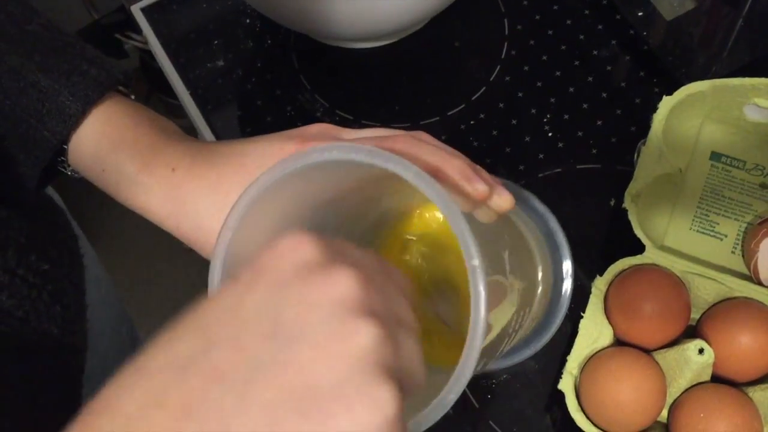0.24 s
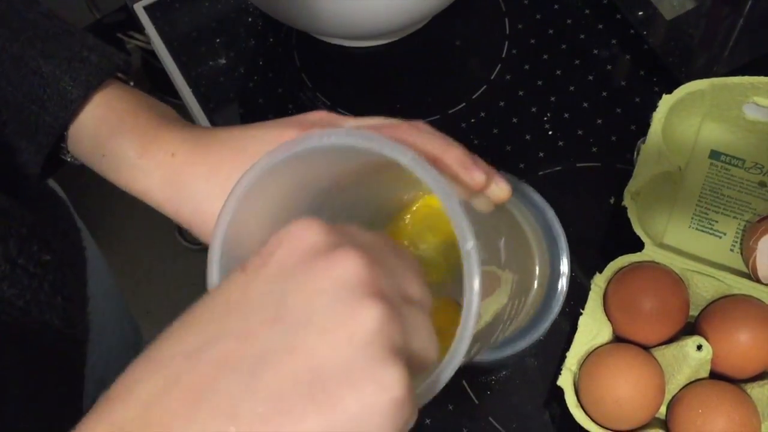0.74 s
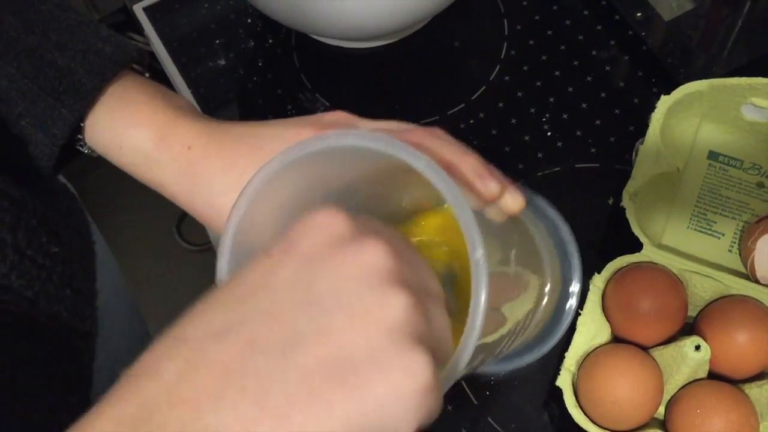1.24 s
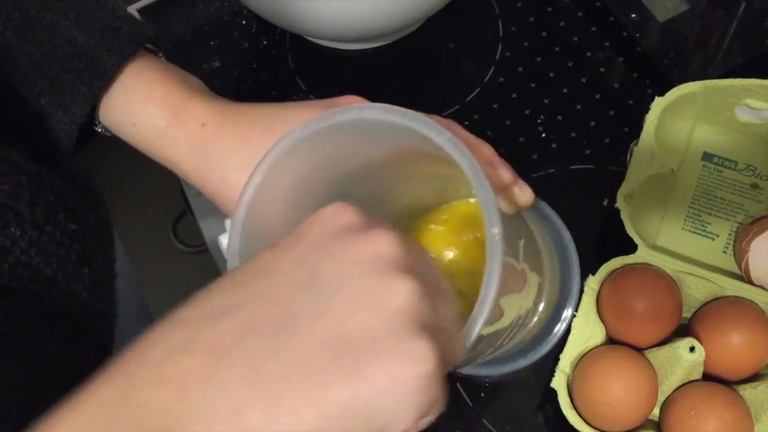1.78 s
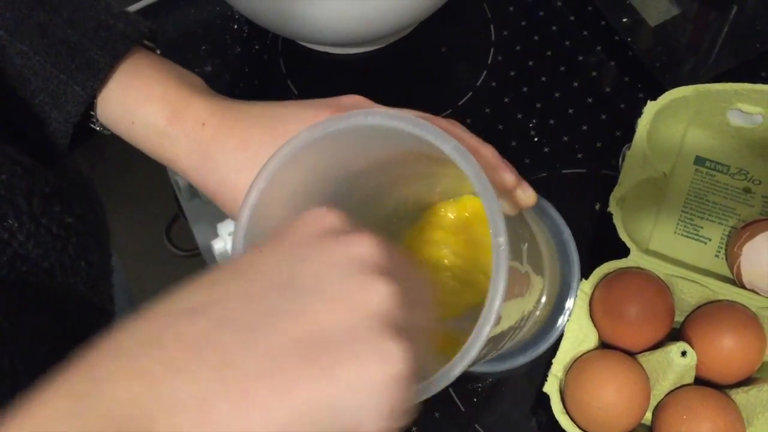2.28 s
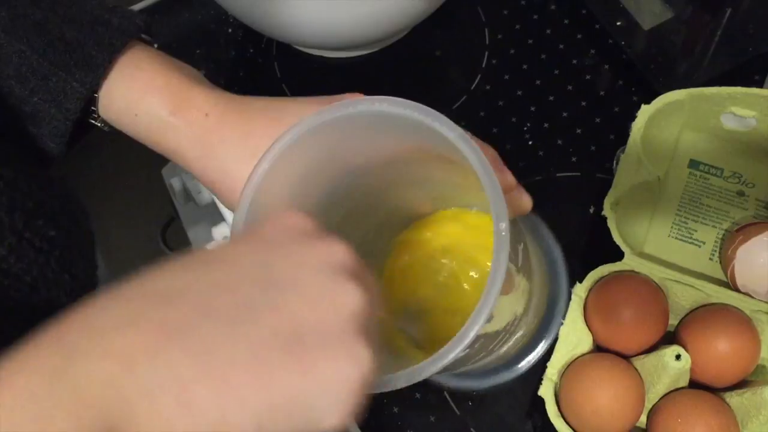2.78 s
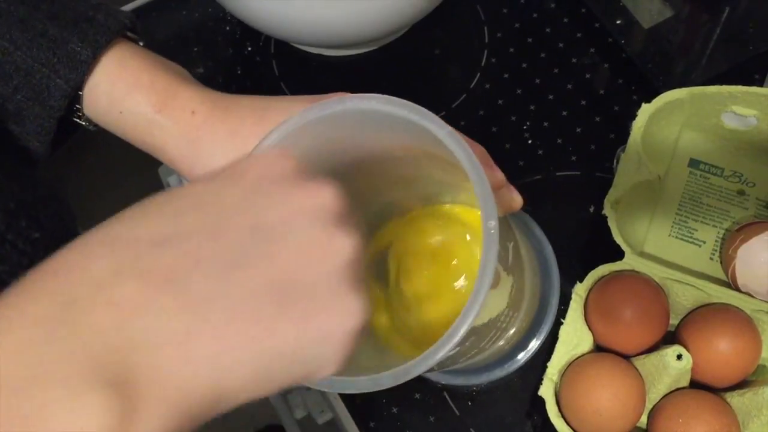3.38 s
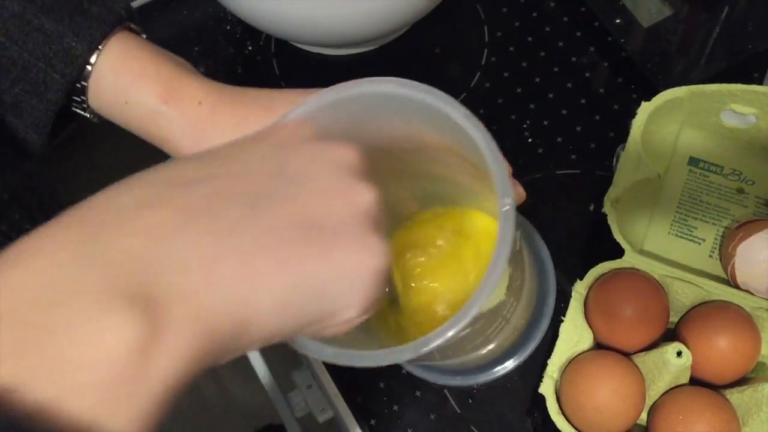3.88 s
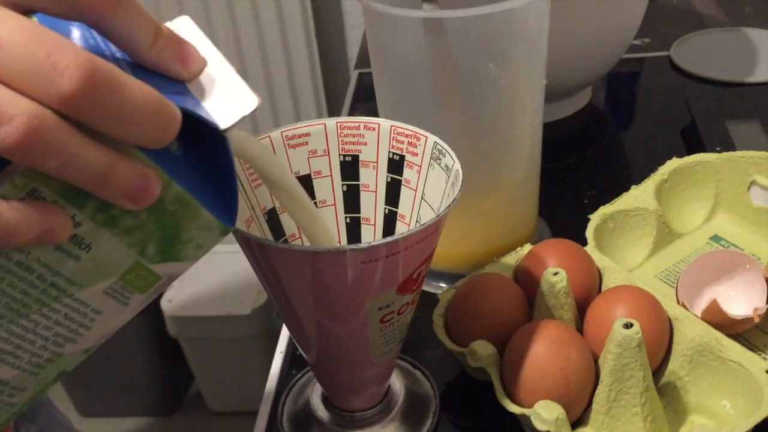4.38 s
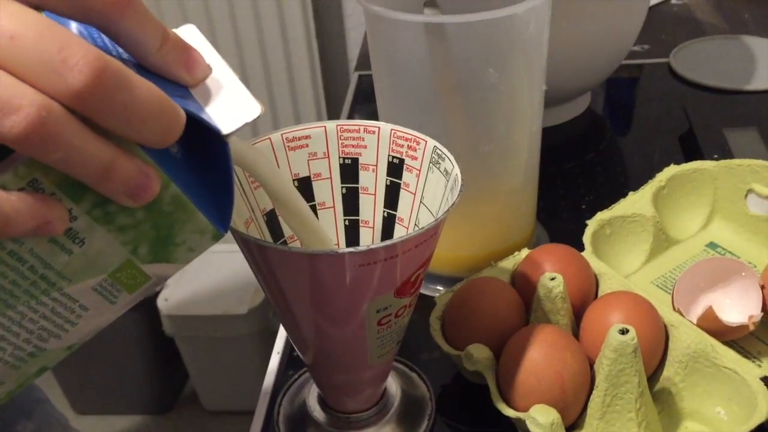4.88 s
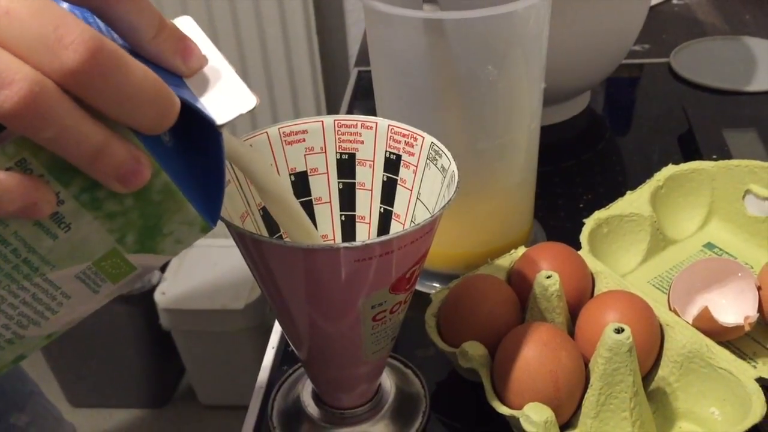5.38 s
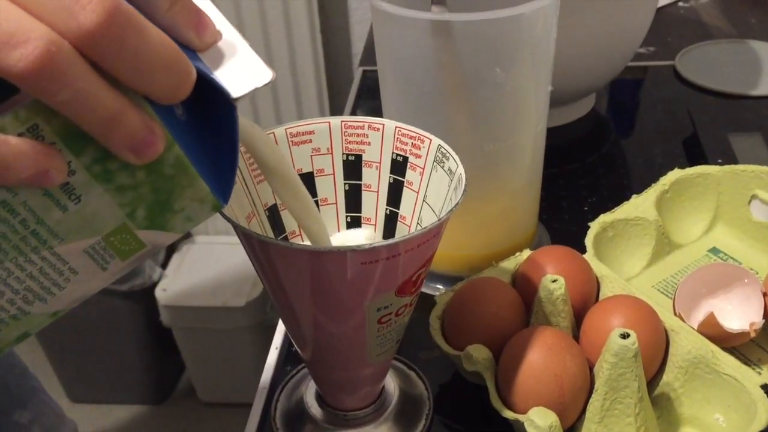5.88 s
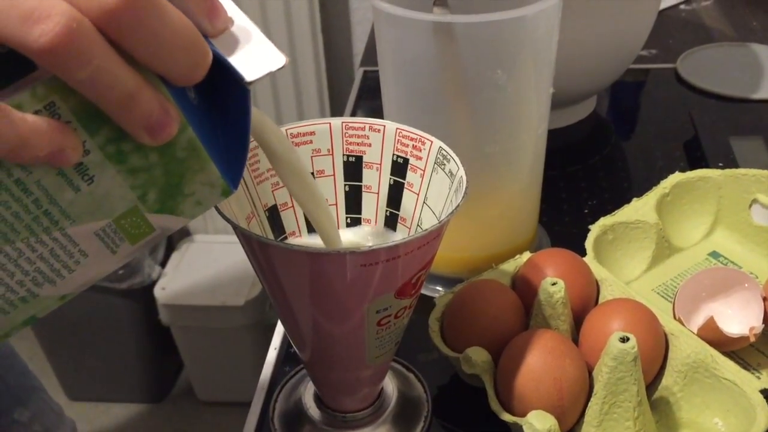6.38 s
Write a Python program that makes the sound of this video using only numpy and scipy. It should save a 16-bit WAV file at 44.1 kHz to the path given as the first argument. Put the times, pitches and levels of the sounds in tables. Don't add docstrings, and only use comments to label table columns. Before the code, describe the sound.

Brisk hollow plastic clicks and wet sloshing of eggs being whisked by fork, cutting to a soft, thin pour of milk over a fridge hum.

```python
import sys
import numpy as np
from scipy import signal
from scipy.fft import rfft, irfft
from scipy.io import wavfile
from scipy.ndimage import uniform_filter1d

SR = 44100
rng = np.random.default_rng(int(sys.argv[2]) if len(sys.argv) > 2 else 0)


def magnitude_from_level(level_db):
    exponent = np.asarray(level_db, float) / 20
    return 10 ** exponent


def materialize(psi):
    bounded = np.clip(np.atleast_2d(psi).T, -1, 1)
    quanta = np.round(bounded * 32767).astype(np.int16)
    wavfile.write(sys.argv[1], SR, quanta)


N = 292716

BREAK = [
    4.2115,
    4.258,
    4.272,
]
STOP_S, POUR_S, FULL_S = BREAK
# pitch_hz, level_db (per Hz)
TINES = [(4000, -11), (6300, -1), (7600, -9), (9400, -3), (10400, -16), (12000, -7), (12700, -14),
         (14500, -12.5), (15600, -14), (16500, -29)]
# pitch_hz, level_db, t60_s
STEEL = [(2300, 6.5, .04), (2600, 15.5, 0.02), (4450, 3, 0.033), (5900, -0.5, 0.025), (6960, -6.5, 0.015),
         (7800, -6.5, 0.044), (9350, 2.5, 0.03), (9970, -11, 0.016), (11100, -9.5, 0.034),
         (12300, -8, 0.03), (13210, -15.5, 0.053), (14300, -1, 0.034)]
# t60_s, level_db (under the blow)
ROOM = [
    (0.28, -24),
    (0.34, -12),
    (0.13, -26.5),
    (0.98, -26),
]


def level(x, db):
    return x * magnitude_from_level(db) / np.sqrt(np.mean(x ** 2))


def peak_one(x):
    return x / np.max(np.abs(x))


def decay(t, t60):
    return 1000. ** (-t / t60)


def onset(t, rise_s):
    return 1 - np.exp(-t / rise_s)


def sine(hz, t):
    return np.sin(2 * np.pi * hz * t)


def coloured(points, size):
    hz, db = np.transpose(points)
    f = np.fft.rfftfreq(size, 1 / SR) + 1
    gain = magnitude_from_level(np.interp(np.log(f), np.log(hz), db))
    return level(irfft(rfft(rng.standard_normal(size)) * gain, size), 0)


def narrow(hz, width):
    skirt = [(hz - 3 * width, -110), (hz - width / 2, 0), (hz + width / 2, 0), (hz + 3 * width, -110)]
    return coloured(skirt, size=N)


def walk(rate):
    k = int(SR / rate)
    steps = np.repeat(rng.standard_normal(N // k + 1), k)
    smooth = uniform_filter1d(uniform_filter1d(steps, k), k)
    return level(smooth[:N], 0)


def ring(modes, t, scatter_db, detune):
    hz, db, t60 = np.transpose(modes)[:, :, None]
    chance = rng.standard_normal((3, len(modes), 1))
    gain = np.sign(chance[2]) * magnitude_from_level(db + scatter_db * chance[0])
    tones = gain * sine(hz * (1 + detune * chance[1]), t) * decay(t, t60)
    return peak_one(np.sum(tones, axis=0))


def add(out, s, x):
    i = int(s * SR)
    out[i:i + len(x)] += x[:N - i]


def kitchen():
    # pitch_hz, level_db (per Hz)
    air_colour = [(25, -48), (58, -21.5), (86, -1), (194, -9.5), (259, -4.5), (461, -19.5), (740, -19),
                  (800, -33), (1100, -32.5), (1500, -28.5), (4600, -38), (8000, -49.5), (14300, -55),
                  (15200, -81.5)]
    # pitch_hz, level_db (rms), wander_width_hz
    fridge = [(43.3, -75.5, 1.8), (86.2, -77, 3.3), (100.2, -60, 6.5), (136.4, -67, 5.6),
              (146.5, -65.5, 4.4), (183.7, -70, 2.5), (209.5, -68, 0.72), (256.2, -64, 9),
              (301.8, -65, 4.4), (333.7, -67, 8), (416, -70, 1.7)]
    air = magnitude_from_level(-55.5 + 0.4 * walk(7)) * coloured(air_colour, size=N)
    return air + sum(magnitude_from_level(db) * narrow(hz, width) for hz, db, width in fridge)


def slosh(stir_db=-55.5, rise_db_s=136.5, fall_db_s=134.5, grain_db=4.0):
    # time_s, level_db
    surges = [(0.0, -53), (0.72, -61), (1.16, -47), (1.73, -59), (2.36, -47.5), (2.89, -64.5), (3.09, -54),
              (3.57, -41), (3.72, -52), (3.97, -56.5), (4.15, -51.5)]
    # pitch_hz, level_db (per Hz)
    colour = [(300, 11.5), (900, 6), (1600, 6.5), (2300, 12), (3200, 4.5), (4600, -7), (7000, -14),
              (11000, -31.5), (16000, -41.5)]
    t, flow = np.arange(N) / SR, magnitude_from_level(stir_db)
    for s, db in surges:
        flow = flow + magnitude_from_level(db + np.minimum(rise_db_s * (t - s), -fall_db_s * (t - s)))
    grain = magnitude_from_level(-9.5 + grain_db * walk(110) + 2.2 * walk(30))
    return flow * grain * coloured(colour, size=N)


def ticks(rate=70, tick_db=-62, spread_db=3, most_db=8, t60=.016):
    out, t = np.zeros(N), np.arange(1024) / SR
    for k, (a, b, c) in enumerate(rng.random((400, 3))):
        peak_db = tick_db + min(-spread_db * np.log(1 - b), most_db)
        rising = sine(1500 * 3.3 ** c * (1 + 3.0 * t), t)
        add(out, min((k + a) / rate, STOP_S), magnitude_from_level(peak_db) * rising * decay(t, t60))
    return out


def grazes(grip_t60_s=.018):
    # start_s, peak_db, length_s
    brushes = [(.004, -43, 0.015), (0.132, -31.5, 0.0076), (0.219, -44, 0.0033), (0.23, -40, 0.0034),
               (0.378, -37, 0.0033), (0.458, -56, .02), (0.718, -55, 0.022), (0.877, -43, 0.0031),
               (0.969, -45, 0.013), (1.096, -46, .008), (1.192, -70, .025), (1.34, -41, 0.0025),
               (1.434, -47, 0.014), (1.67, -45.5, 0.019), (2.046, -40, 0.013), (2.308, -34, 0.0058),
               (2.422, -55, .012), (2.571, -28.5, 0.002), (2.758, -54, 0.0036), (2.983, -50, 0.0027),
               (3.013, -45.5, 0.0082), (3.147, -46, 0.011), (3.267, -52.5, 0.011), (3.481, -45.5, 0.0072),
               (3.758, -35.5, 0.013), (3.803, -38.5, 0.0096), (3.952, -49, 0.0094), (4.053, -41, 0.012),
               (4.091, -54, .003), (2.536, -27, 0.0054), (3.548, -29, 0.012)]
    out, t = np.zeros(N), np.arange(4096) / SR
    for s, peak_db, length in brushes:
        slide = np.exp(-t / length)
        gripped = ring(STEEL, t, scatter_db=3.5, detune=0.013) * decay(t, grip_t60_s)
        rough = rng.standard_normal(len(t)) ** 3 * slide
        y = signal.fftconvolve(gripped, rough)[:len(t)]
        hiss = magnitude_from_level(-18.0) * slide * coloured(TINES, size=len(t))
        add(out, s, magnitude_from_level(peak_db) * (peak_one(y) + hiss))
    return out


def blows():
    # start_s, peak_db, ring_hz, second_ring_hz
    touches = [(0.039, -39.5, 2380, 2900), (0.249, -34, 2700, 3060), (0.2625, -22.5, 2490, 2970),
               (0.513, -27, 2620, 2170), (0.7455, -26.5, 2680, 3200), (0.9926, -27, 3110, 2680),
               (1.246, -30.5, 2560, 3160), (1.465, -20.5, 2924, 2470), (1.722, -34, 2720, 3080),
               (1.977, -35, 2650, 3070), (2.215, -40.5, 3170, 2600), (2.4621, -35.5, 2600, 2980),
               (3.1796, -28.5, 2900, 2300), (3.4372, -41, 2170, 2600), (3.462, -23, 2200, 2590),
               (3.704, -38, 2600, 2970), (3.719, -25, 2300, 2100), (3.9747, -24, 2970, 2250)]
    # start_s, peak_db, ring_hz, second_ring_hz, air_db (against the click)
    flats = [(0.1199, -22, 2970, 2110, -2), (0.3568, -18.5, 3080, 2020, -3.5),
             (0.586, -17.5, 3110, 3570, -2), (0.836, -18.5, 3060, 2010, -3.5),
             (1.0815, -18, 3090, 1990, -8.5), (1.313, -20.5, 3120, 2190, -4.5),
             (1.5422, -18.5, 3180, 2480, -4.5), (1.5828, -19.5, 2640, 3320, -0.5),
             (1.5899, -21, 3170, 3550, -4.5), (1.7901, -19.5, 3070, 2040, -2.5),
             (1.8161, -20, 3350, 2820, -1), (1.8828, -32.5, 2600, 3150, -6), (1.938, -47, 2120, 2600, -14),
             (2.0369, -18.5, 3220, 2650, -9), (2.1302, -34.5, 2720, 2200, -11),
             (2.1843, -40, 2120, 2600, -11), (2.2815, -19.5, 3210, 2170, -6.5),
             (2.3002, -18, 3640, 5240, -1), (2.316, -25.5, 2200, 2980, -5.5), (2.5335, -18, 4550, 4250, 2),
             (2.986, -21.5, 2495, 4600, 1.5), (3.251, -20.5, 3230, 2560, -4), (3.541, -17, 2350, 3090, -10),
             (3.755, -27.5, 3110, 2500, -5), (4.0479, -32, 2270, 2350, -3.5)]
    # start_s, peak_db, ring_hz, air_db, treble_db (last two against the click)
    edges = [(0.1454, -15, 2500, -14, -15), (0.393, -21, 2700, -21, -19), (0.6411, -32, 4250, -6.5, -14.5),
             (0.89, -14.5, 2600, -13, -15.5), (1.1227, -20, 2550, -12, -17),
             (1.3601, -25.5, 2620, -14.5, -18), (1.439, -58, 2120, -1, -8),
             (1.6287, -17.5, 2450, -7.5, -12), (1.851, -22.5, 2500, -10.5, -12),
             (2.0825, -13.5, 2610, -19, -12), (2.3426, -14, 2687, -15, -12.5),
             (2.5817, -13.5, 2570, -12, -11), (2.7788, -8, 1486, -18, -11.5),
             (3.049, -12, 2590, -12.5, -13.5), (3.091, -35, 2570, -4.5, -16),
             (3.302, -12.5, 2800, -24.5, -13), (3.373, -27, 2600, -34, -22),
             (3.5821, -15, 3960, -17.5, -13.5), (3.6403, -28.5, 2590, -15.5, -18),
             (3.8372, -8.5, 5210, -28.5, -9.5), (3.8884, -31, 4400, -11, -16),
             (4.1063, -15, 1606, -34, -10.5)]
    found = []
    for s, db, hz, hz2, air_db in flats:
        treble_db = -20 + 8 * np.log2(hz / 3013)
        found.append((s, db, hz, hz2, air_db, -23.5, treble_db))
    for s, db, hz, air_db, treble_db in edges:
        found.append((s, db, hz, 1.08 * hz, air_db, -16, treble_db))
    for s, db, hz, hz2 in touches:
        treble_db = -28 + 0.85 * (db + 30.5)
        found.append((s, db, hz, hz2, -19, -45.5, treble_db))
    return sorted(found)


def causal(cepstrum):
    half = len(cepstrum) // 2
    return cepstrum * np.concatenate([[1], 2 * np.ones(half - 1), [1], np.zeros(half - 1)])


def crack(colour, t, t60, rise_s, patchy_db=4.5, patch_hz=260, tick_db=2.0, tick_s=0.00066):
    # delay_s, level_db
    echoes = [
        (.0045, -14.5),
        (.009, -15),
        (0.015, -27.5),
    ]
    fall = onset(t, rise_s) * (decay(t, t60) + magnitude_from_level(tick_db) * np.exp(-t / tick_s))
    shape = fall + sum(magnitude_from_level(db) * np.interp(t - s, t, fall, left=0) for s, db in echoes)
    f = np.fft.rfftfreq(len(t), 1 / SR)
    spots = np.tanh(rng.standard_normal(256))
    patches = magnitude_from_level(patchy_db * np.interp(f / patch_hz, np.arange(256), spots))
    response = np.exp(rfft(causal(irfft(np.log(patches)))))
    burst = coloured(colour, size=len(t)) * shape
    return peak_one(irfft(rfft(burst) * response, len(t)))


def room(energy, colours, build_s=0.002, grain_db=2.8):
    # pitch_hz, level_db (against the tail), width_hz
    tail_rings = [(962, -14.5, 71), (1210, -16.5, 100), (1550, -19, 70), (2170, -11.5, 60),
                  (2555, -10, 100), (3110, -17, 60), (3520, -14, 70), (4250, -20, 89), (4600, -18.5, 70),
                  (5240, -19.5, 50), (5710, -18.5, 40), (6315, -18.5, 44)]
    out, build = 0, np.exp(-1 / (build_s * SR))
    tones = [coloured(colour, size=N) for colour in colours]
    rings = sum(magnitude_from_level(db + 1.5 + 2.3 * walk(25)) * narrow(hz, width) for hz, db, width in tail_rings)
    tones[0] = tones[0] + rings
    for part, tone, (t60, db) in zip(energy, tones, ROOM):
        power = signal.lfilter([1], [1, -np.exp(-2 * np.log(1000) / (t60 * SR))], part)
        power = signal.lfilter([1 - build], [1, -build], power)
        out = out + magnitude_from_level(db + grain_db * walk(90)) * np.sqrt(np.abs(power)) * tone
    return out


def fork(beat_hz=40, beat=0.74, base_rise_s=0.012, rise_s=0.00057, flat_from_db=-17, flat_span_db=9):
    # pitch_hz, level_db (per Hz)
    upper_colour = [(900, -31), (1750, -14), (2150, 2), (2380, 0), (2620, -1.5), (2900, -1.5), (3200, -0.5),
                    (3700, -4), (4550, -3), (4900, -5.5), (5300, -8), (6500, -12.5), (7200, -13),
                    (9000, -35)]
    # pitch_hz, level_db (per Hz)
    lower_colour = [(150, -26.5), (260, 4.5), (600, 0.5), (760, -3.5), (950, -4), (1100, -2), (1300, 0.5),
                    (1550, -6), (1750, -9.5), (2300, -29.5)]
    # pitch_hz, level_db, t60_s
    soft_modes = [(2076, -6, 0.082), (2270, -4, 0.02), (2570, -4, 0.055), (3170, 1, 0.03),
                  (3560, -5.5, 0.047), (4380, 0, 0.031), (5250, -2, 0.0044)]
    # pitch_hz, level_db, t60_s
    hard_modes = [(2200, -5.5, 0.038), (2500, 3, 0.037), (2640, 2.5, 0.028), (2830, -1, .03),
                  (2980, -1.5, .03), (3490, -4, .03), (4013, -4.5, 0.018), (4600, 1, 0.054),
                  (5230, -5.5, 0.042), (6070, -4, 0.017)]
    # pitch_hz, level_db, t60_s
    air_modes = [(481.6, 4, 0.15), (347, -18.5, 0.059), (583, -20.5, 0.13), (500, -17.5, 0.068),
                 (446, -10.5, 0.11)]
    # pitch_hz, level_db, t60_s
    base_modes = [(166, -1, 0.1614), (124.4, -11, 0.26), (222, -5, 0.065)]
    # pitch_hz, level_db (per Hz)
    low_room = [(90, -22), (150, -6.5), (300, -4.5), (420, -0.5), (485, 7), (560, -1.5), (750, -40)]
    out, t = np.zeros(N), np.arange(8192) / SR
    energy = np.zeros((len(ROOM), N))
    for s, peak_db, hz, hz2, air_db, lower_db, treble_db in blows():
        flat = np.clip((air_db - flat_from_db) / flat_span_db, 0, 1)
        focused = [(f, db - 5.5 * abs(np.log2(f / hz))) for f, db in upper_colour]
        wall = magnitude_from_level(-2.5 - 8 * flat) * crack(focused, t, 0.023, rise_s)
        wall += flat * magnitude_from_level(-4.0) * ring(soft_modes, t, scatter_db=3.0, detune=0.017)
        hard_gain = (1 - flat) * magnitude_from_level(-6.0 + 0.43 * (lower_db + 14.5))
        wall += hard_gain * ring(hard_modes, t, scatter_db=6.0, detune=0.021)
        pair = sine(hz, t) - magnitude_from_level(-3.0) * sine(hz2, t)
        wall += magnitude_from_level(-8.0 + 4.3 * flat) * pair * decay(t, 0.028)
        linger = [(hz - 400, -30), (hz - 110, 0), (hz + 110, 0), (hz + 400, -30)]
        wall += magnitude_from_level(-29) * coloured(linger, size=len(t)) * decay(t, .16)

        tines = crack(TINES, t, 0.0072, rise_s, patchy_db=3.5)
        tines += magnitude_from_level(-17.0 + 3.6 * flat) * ring(STEEL, t, scatter_db=4.5, detune=0.023)
        lower = crack(lower_colour, t, 0.031, 3 * rise_s)

        swell_hz = beat_hz * magnitude_from_level(-0.35 * np.clip(peak_db + air_db + 22, -4, 12))
        swell = 1 - beat * np.cos(2 * np.pi * swell_hz * t) * np.exp(-t / 0.043)
        air = ring(air_modes, t, scatter_db=2.5, detune=0.0086) * swell
        base = ring(base_modes, t, scatter_db=-4.0, detune=0.022) * onset(t, base_rise_s)
        base_gain = magnitude_from_level(air_db - 9.0) + magnitude_from_level(lower_db - 7.5)

        parts_db = np.array([-3, lower_db + 1.5, treble_db + 10.0, air_db - 0.5])
        blow = magnitude_from_level(parts_db) @ np.array([peak_one(wall), lower, tines, air]) + base_gain * base
        add(out, s, magnitude_from_level(peak_db) * blow)
        send_db = peak_db + parts_db - 2.8 * flat + 0.3 * (lower_db + 18)
        energy[:, int(s * SR)] = magnitude_from_level(send_db) ** 2
    out = signal.sosfilt(signal.butter(2, 90, "high", fs=SR, output="sos"), out)
    return out + room(energy, [upper_colour, lower_colour, TINES, low_room])


def belly(t60=0.034, bright_t60=.03, rise_s=.0008):
    # start_s, peak_db,
    # pitch_hz
    belly_notes = [(.1199, -38, 987), (0.145, -26.5, 1260), (.1454, -27, 1470), (0.3567, -39, 960),
                   (0.392, -29, 1320), (.5866, -39, 885), (.6419, -43.5, 1190), (0.837, -36, 1020),
                   (.89, -32, 1320), (.89, -33, 1010), (1.081, -33.5, 1020), (1.123, -30.5, 1320),
                   (1.3144, -39.5, 995), (1.3603, -47, 1168), (1.5414, -37, 1350), (1.6298, -32.5, 1380),
                   (1.7904, -43, 870), (1.851, -33, 1084), (2.0369, -43, 940), (2.0827, -25.5, 1320),
                   (2.2824, -42, 960), (2.3434, -23.5, 1350), (2.5819, -26, 1237), (2.7787, -35.5, 940),
                   (2.9848, -48, 940), (3.048, -24, 1366), (3.251, -42, 940), (3.302, -26.5, 967),
                   (3.302, -30, 1620), (3.5415, -44, 904.7), (3.5823, -34, 820), (3.8368, -24, 1454),
                   (3.8376, -30, 1025), (.997, -43, 466), (1.148, -38, 474), (1.252, -44, 475),
                   (2.5441, -26.5, 470)]
    # start_s, peak_db, pitch_hz
    bright_notes = [(.1454, -29, 3948), (.1454, -22, 5910), (.393, -30, 2040), (.393, -40, 3220),
                    (.5866, -37, 4390), (.6419, -40, 2730), (.836, -25, 2266), (.89, -28, 4010),
                    (.89, -28, 4380), (1.0814, -32, 2520), (1.1227, -26.5, 3900), (1.3138, -32, 4360),
                    (1.3601, -34, 4250), (1.6284, -32, 3250), (1.6284, -30.5, 4600), (1.851, -39, 2120),
                    (2.0827, -29, 2190), (2.0827, -32, 3500), (2.0827, -20.5, 6217), (2.3422, -21, 6080),
                    (2.3422, -32, 2217), (2.5326, -24.5, 3210), (2.5817, -28, 3456), (2.5817, -29, 5900),
                    (2.7786, -17, 2900), (2.7786, -23, 4600), (2.9858, -31, 4340), (3.048, -27, 3310),
                    (3.048, -26, 4600), (3.302, -19, 4570), (3.302, -24, 4920), (3.5823, -23, 4100),
                    (3.8373, -19, 3780), (3.8373, -30, 2500), (4.1064, -31, 2430), (.133, -24, 2080),
                    (1.3601, -32, 6750), (1.3601, -42, 14600), (2.5711, -21, 9000), (2.5711, -21, 12400),
                    (2.7786, -32, 5500), (2.7786, -33, 6540), (3.302, -27, 6720), (3.462, -34, 3600),
                    (3.462, -36, 7950), (3.7186, -31, 2300), (1.5901, -29, 8850), (3.757, -44, 14200),
                    (3.757, -40, 4460), (1.465, -34, 2170), (1.5827, -35, 5250)]
    out, t = np.zeros(N), np.arange(4096) / SR
    for notes, fade in ((belly_notes, t60), (bright_notes, bright_t60)):
        for s, peak_db, hz in notes:
            damping = max(1, hz / 4500) * min(1, hz / 1100)
            add(out, s, magnitude_from_level(peak_db) * sine(hz, t) * onset(t, rise_s) * decay(t, fade / damping))
    return out


def stream(rate=45, patter_db=-66, spread_db=2.0, drop_t60=.025, rise_s=0.0011):
    drops = list([(4.717, -57, 1580), (4.804, -52, 1200), (5.058, -60.5, 3820), (5.135, -57, 2950),
                  (5.57, -55, 1540), (5.695, -54, 1710), (5.737, -54, 2250), (5.838, -54, 1500),
                  (5.965, -54, 1480), (6.02, -58, 2950), (6.025, -52, 1600), (6.053, -55, 1440),
                  (6.214, -53, 1680), (6.329, -52, 1470), (6.45, -54, 1550)])
    # start_s, length_s, pitch_hz, level_db (rms)
    singing = [(5.9, .13, 2020, -69), (6.09, .06, 2020, -71), (6.34, .14, 2010, -73),
               (5.76, .08, 1190, -73), (6.1, .08, 1190, -73), (6.2, .16, 1200, -69), (5.55, .06, 870, -73)]
    # start_s, level_db, t60_s
    spray = [
        (5.065, -62, 0.14),
        (5.178, -57, 0.29),
        (5.228, -59.5, 0.38),
        (5.398, -63, 0.24),
    ]
    # pitch_hz, level_db (per Hz)
    spray_colour = [(600, -20), (900, 1), (2200, 5), (3800, -20), (6000, -17), (12000, -35)]
    out, t = np.zeros(N), np.arange(8192) / SR
    for k, (a, b, c) in enumerate(rng.random((400, 3))):
        s = POUR_S + (k + a) / rate
        if s < N / SR:
            drops.append((s, patter_db - spread_db * np.log(1 - b), 1350 * 1.8 ** (c * c)))
    u = t[:2048]
    for s, peak_db, hz in drops:
        rising = sine(hz * (1 + 0.52 * u), u)
        add(out, s, magnitude_from_level(peak_db) * rising * onset(u, rise_s) * decay(u, drop_t60))
    for s, length, hz, db in singing:
        swell = np.sqrt(np.sin(np.pi * np.clip(t / length, 0, 1)) ** 2)
        add(out, s, magnitude_from_level(db + 3.0) * sine(hz, t) * swell)
    for s, db, t60 in spray:
        grain = magnitude_from_level(db + 2.3 * walk(140)[:len(t)])
        add(out, s, grain * coloured(spray_colour, size=len(t)) * decay(t, t60))
    return out


def milk(glide=0.098, rise_s=0.00097, flutter_db=3.0, tail_t60=0.1, froth_t60=0.039, wobble=.015):
    # start_s, peak_db, pitch_hz, t60_s
    bubbles = [(4.298, -66.5, 8250, 0.056), (4.553, -52.5, 2030, 0.034), (4.61, -53.5, 5000, 0.012),
               (4.887, -54, 3170, 0.021), (4.98, -57.5, 5940, .015), (5.168, -56, 7470, 0.016),
               (5.183, -51, 3520, 0.013), (5.402, -58.5, 3390, 0.012), (6.02, -68, 7300, .015),
               (5.067, -51, 1880, 0.031), (5.076, -50, 2300, 0.033), (5.095, -54.5, 5930, 0.017),
               (5.153, -47, 1430, 0.017), (5.168, -41.5, 1300, 0.017), (5.177, -31.5, 977, 0.025),
               (5.183, -34, 860, 0.051), (5.185, -32, 2100, 0.018), (5.207, -38, 910, 0.022),
               (5.218, -32, 1010, 0.016), (5.231, -42, 990, 0.013), (5.236, -46, 1600, 0.018),
               (5.182, -39, 1460, 0.016), (5.229, -55, 4000, 0.025), (5.228, -60, 3580, 0.046),
               (5.246, -58, 3000, 0.065), (5.25, -49, 864, 0.11), (5.4, -50, 1280, 0.041),
               (5.401, -48, 2320, 0.095), (5.401, -45.5, 1880, 0.028), (5.694, -48.5, 9200, 0.015),
               (5.737, -58, 5800, 0.014)]
    # start_s, peak_db, pitch_hz
    froth = [(4.3324, -70, 12200), (4.395, -55, 11200), (4.4712, -62, 10400), (4.5524, -66, 14900),
             (5.0479, -56, 12800), (5.075, -59.5, 7540), (5.0894, -66.5, 9310), (5.1253, -61, 12000),
             (5.153, -53, 12500), (5.167, -49, 7560), (5.2044, -58, 12900), (5.2494, -72, 7300),
             (5.3144, -66, 9750), (5.695, -60, 9430), (5.7364, -72, 7050)]
    # pitch_hz, level_db (rms), width_hz
    trickle = [(1190, -78.5, 39), (1469, -72, 58), (1723, -73.5, 250), (2030, -76, 35), (2250, -82, 37),
               (858, -84, 32), (2446, -84.5, 39), (2800, -87.5, 51)]
    out, t = np.zeros(N), np.arange(4096) / SR
    for s, peak_db, hz, t60 in bubbles:
        tremble = wobble * (1 + hz / 2500) * coloured([(40, -13), (300, 6), (900, -42)], size=len(t))
        pitch = hz * (1 + glide * t / t60 + tremble)
        tone = np.sin(2 * np.pi * np.cumsum(pitch) / SR)
        add(out, s, magnitude_from_level(peak_db) * tone * onset(t, rise_s) * decay(t, t60))
    tail = rng.standard_normal(len(t)) * decay(t, tail_t60)
    out += magnitude_from_level(-26.0) * signal.fftconvolve(out, tail)[:N]
    for s, peak_db, hz in froth:
        colour = [(hz / 6.1, -25), (hz / 1.6, -3), (hz, 0), (hz * 1.2, -5)]
        add(out, s, magnitude_from_level(peak_db - 8) * coloured(colour, size=len(t)) * decay(t, froth_t60))
    return out + sum(magnitude_from_level(db + flutter_db * walk(25)) * narrow(hz, width) for hz, db, width in trickle)


def scene():
    t, hum = np.arange(N) / SR, kitchen()
    before = t < STOP_S
    after = np.clip((t - POUR_S) / (FULL_S - POUR_S), 0, 1)
    beating = slosh() + ticks() + grazes() + fork() + belly()
    pouring = stream() + milk()
    return (before * (beating + hum) + after * (pouring + hum))[None]


def low_pass(x):
    return signal.sosfilt(signal.butter(12, 16990, fs=SR, output="sos"), x)


def record(dry):
    dry = signal.sosfilt(signal.butter(4, 36, "high", fs=SR, output="sos"), dry)
    dry = .7 * np.tanh(dry / .7)
    dry = signal.sosfilt(signal.cheby2(10, 50, 17050, fs=SR, output="sos"), dry)
    return low_pass(dry)


dry = scene()
out = record(dry)
materialize(out)
```